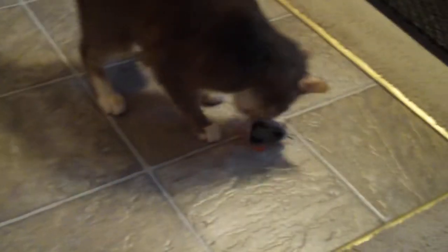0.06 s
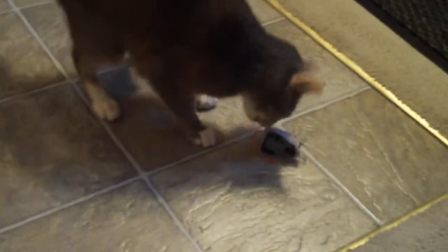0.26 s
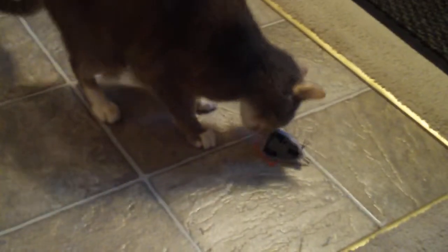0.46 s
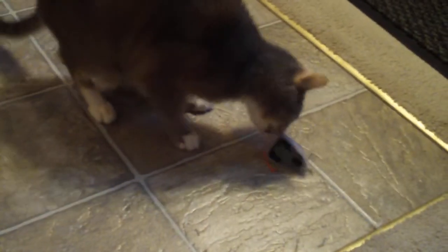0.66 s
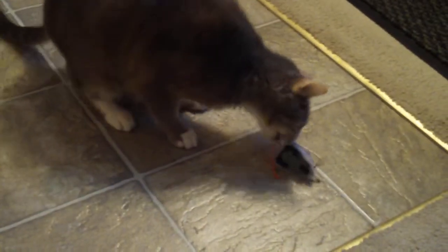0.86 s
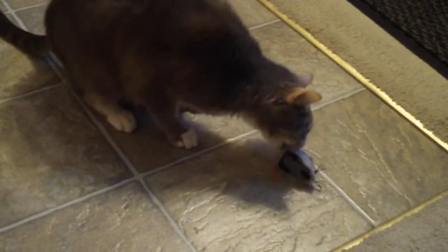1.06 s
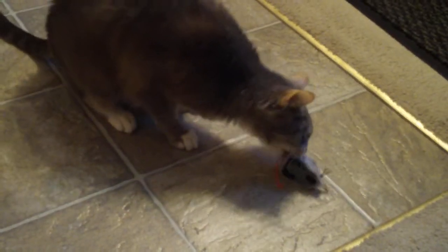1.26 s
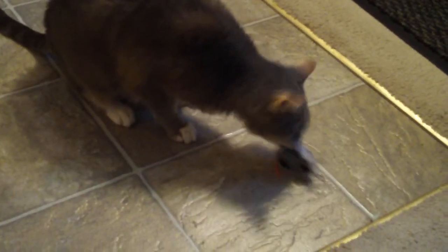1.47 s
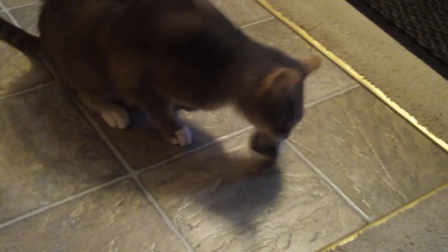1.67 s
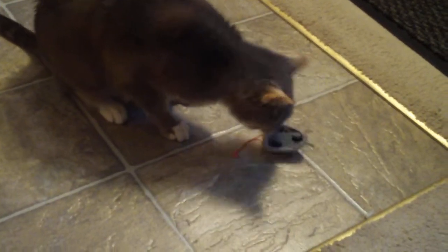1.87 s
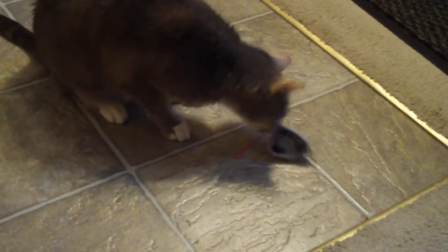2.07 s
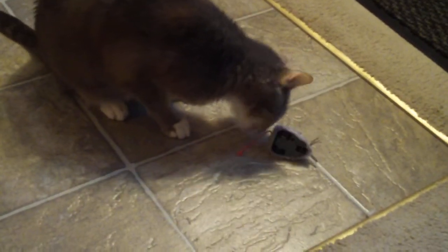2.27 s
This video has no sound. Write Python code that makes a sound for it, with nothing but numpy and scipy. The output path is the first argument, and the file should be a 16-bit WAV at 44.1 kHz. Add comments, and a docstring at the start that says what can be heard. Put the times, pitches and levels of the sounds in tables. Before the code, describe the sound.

In a small room, a battery-powered toy mouse whirs three times, gears ticking and plastic rattling against tile. It clacks as a cat tips it over, then runs a fourth time, over a faint deep rumble and steady hiss.

```python
"""Deep rumble and steady, thin-edged hiss throughout; a small room answers the toy faintly.
From 0.2 s a motorised toy mouse whirs in three short runs on a tiled floor: gears tick and catch,
loose works rattle in the hollow plastic shell, the shell knocks on the tile.
At 1.5-1.7 s a cat nudges the toy and knocks it over; the body clacks.
At 1.8 s a fourth run follows, tipped over and so in another colour."""
import sys
import numpy as np
from scipy import signal
from scipy.fft import rfft, irfft, next_fast_len
from scipy.io import wavfile
from scipy.ndimage import uniform_filter1d, map_coordinates

SR = 44100
rng = np.random.default_rng(int(sys.argv[2]) if len(sys.argv) > 2 else 0)


def wav_out(sig):
    """Save sig, one row per channel (or a flat mono array), as 16-bit PCM at SR to the path in sys.argv[1]."""
    wavfile.write(sys.argv[1], SR, np.round(np.clip(np.atleast_2d(sig).T, -1, 1) * 32767).astype(np.int16))


N = 105840

# motor runs: (start [s], driven for [s], level [dB], swell [dB/s], run-down [dB/s], tipped [0/1])
MOTOR_RUNS = [(.204, 0.18, -32, 14, 125, 0), (0.614, 0.17, -32, 8.5, 110.5, 0),
              (.966, .255, -32, -4.5, 160.5, 0), (1.789, .25, -33.5, 5, 144.5, 1)]
# works grind harder or ease off: (time [s], half length [s], change [dB])
GRIND_SURGES = [(0.338, 0.011, -9), (0.357, 0.0099, 2), (0.66, 0.011, 5.5), (0.684, 0.021, -4.5),
                (0.747, 0.034, 3), (0.772, 0.024, -7.5), (0.798, 0.0046, 7.5), (1.119, 0.006, 4.5),
                (1.148, 0.016, -4.5), (1.176, 0.0095, 4), (1.281, 0.014, 8), (1.99, 0.02, 3),
                (2.056, 0.011, -6.5)]
# works, toy upright: (frequency [Hz], level [dB])
UPRIGHT_SPECTRUM = [(300, -22), (1100, -22.5), (1700, -13.5), (2600, 3.5), (3600, -13), (4350, -6.5),
                    (4900, -0.5), (6100, -0.5), (7900, -8.5), (8600, -4), (9500, 4), (10500, 4), (11600, 0),
                    (12400, 2), (14600, -6.5), (15400, -10)]
# works, toy tipped over: (frequency [Hz], level [dB])
TIPPED_SPECTRUM = [(300, -24), (1100, -24.5), (2600, -4), (3600, -11.5), (4800, -2.5), (6100, -1.5),
                   (7500, -6), (8800, -4), (10300, 3), (11100, 4.5), (12300, -1.5), (13300, -6.5),
                   (15400, -20.5)]
# gear catches: (time [s], level [dB])
GEAR_CATCHES = [(.2455, -16), (.3015, -33), (.361, -29), (.381, -21), (.7915, -16), (.848, -20.5),
                (.8985, -22), (1.0392, -24), (1.2158, -16), (1.796, -18), (2.079, -33), (2.111, -22)]
# shell resonances: (frequency [Hz], width [Hz], level [dB])
SHELL_MODES = [(1680, 142, -16), (2510, 204, -9), (2590, 124, 2), (2997, 93, -12), (4950, 100, -17.5)]
# shell knocks on the tile: (time [s], level [dB])
TILE_KNOCKS = [(.247, -29), (.348, -23.5), (.361, -46), (.378, -29), (.397, -31), (.414, -31), (.448, -25),
               (.520, -30.5), (.618, -31), (.707, -25.5), (.7915, -19.5), (.801, -24), (.825, -25),
               (.9686, -25), (1.003, -22), (1.176, -23), (1.187, -28), (1.248, -23.5), (1.256, -28),
               (1.275, -27), (1.296, -23), (1.526, -43), (1.586, -40), (1.6025, -23), (1.609, -24.5),
               (1.622, -31), (1.644, -26.5), (1.692, -27.5), (1.719, -31), (1.783, -36), (1.792, -22.5),
               (1.879, -28), (1.983, -21), (1.988, -27.5), (2.018, -25), (2.154, -43)]
# body clacks as the cat tips it: (time [s], level [dB])
TIP_CLACKS = [(1.513, -39), (1.529, -39), (1.602, -30), (1.6203, -18.5), (1.6238, -26), (1.631, -26),
              (1.6425, -23.5), (1.655, -27), (1.6838, -19.5), (1.6932, -29), (1.699, -27.5), (1.715, -35)]
# clack colour: (frequency [Hz], level [dB])
CLACK_SPECTRUM = [(400, -26.5), (1800, -8.5), (3700, -11), (4800, 4), (6500, -13), (9000, -9), (11400, 2),
                  (12600, -5), (13500, -12), (15400, -20)]
# dull bumps: (time [s], level [dB])
DULL_BUMPS = [(.068, -47), (1.216, -39), (1.230, -39.5), (2.066, -44)]
# bump colour: (frequency [Hz], level [dB])
BUMP_SPECTRUM = [(300, -16.5), (700, -7.5), (1100, 0.5), (1550, -8.5), (2200, -5), (6000, -56)]
# sagging hum: (time [s], frequency [Hz], level [dB])
HUM_GLIDE = [(0.679, 304.2, -58), (0.841, 281.6, -57)]
# room rumble: (frequency [Hz], level [dB])
RUMBLE_SPECTRUM = [(12, -11), (27, 5.5), (35, -14), (45, -4.5), (60, -8), (100, -17.5), (130, -16.5),
                   (180, -19.5), (280, -18.5), (450, -30), (600, -45.5), (2000, -48), (8000, -50)]
# rumble swells: (time [s], change [dB])
RUMBLE_SWELLS = [(.12, 2.5), (.3, -4), (.6, 2.5), (.85, -1.5), (1.42, 4.5), (1.57, -4), (1.7, 1), (2.05, 0),
                 (2.299, 5.5)]
# steady hiss with a thin, high edge near 15 kHz: (frequency [Hz], level [dB])
HISS_SPECTRUM = [(100, 10), (900, 10), (1600, 6), (3200, 1.5), (4200, 5.5), (5100, 2), (6500, -6.5),
                 (7500, -1), (7900, 10), (8600, 1), (9800, 2.5), (11300, -14), (12200, -4.5), (13700, -7),
                 (14600, -26), (15000, -7), (15400, 7)]
# DC per channel, left then right: (offset [full scale])
CHANNEL_OFFSETS = [
    [.1303],
    [-.1253],
]

START_DIP_DB, SPIN_UP_S = 5, .022
COAST_S, STOP_DB_PER_S = .18, 230  # friction stops the works after coasting
TICKS_PER_S, TICK_SPREAD_DB, TICK_RISE_S, TICK_DECAY_S = 300, 7, .0014, .00073
TAPS_PER_S, TAP_SPREAD_DB, TAP_RISE_S, TAP_DB = 200, 6, .0006, -5.5
SPEED_EXPONENT, TAP_EXPONENT = .3, .75
SCATTER_GAPS, RUBBING_DB = .3, -14.5
MODE_DETUNE, MODE_SPREAD_DB = .018, 2
SNAP_RISE_S, CATCH_DECAY_S, CLACK_DECAY_S = .0011, .00042, .00017
CHATTER_DB, CHATTER_DECAY_S = -20.5, .006
BUMP_RISE_S, BUMP_DECAY_S = .0026, .0047
HUM_WAVER_HZ, HUM_FADE_DB_PER_S = 18, 90
ROOM_T60_S, ROOM_DB = .14, -10
RUMBLE_DB, THROB_DB, THROBS_PER_S = -51, 1.5, 14
DRONE_HZ, DRONE_DB, HISS_DB = 34.7, -50.5, -56.5
BAND_LIMIT_HZ = 15400


def motor_run(start_s, driven_s, level_db, swell_db_per_s, run_down_db_per_s, tipped):
    """Works spin up, rattle and coast, ticks slowing as they fade. Returns rasp and shell taps."""
    now = np.arange(N) / SR
    t = now - start_s
    coast_s = np.maximum(t - driven_s, 0)
    dip_db = START_DIP_DB * np.exp(-np.maximum(t, 0) / SPIN_UP_S)
    drive_db = swell_db_per_s * np.clip(t, 0, driven_s) - dip_db
    strength = amp(drive_db - run_down_db_per_s * coast_s) * (t > 0)
    surge_db = sum(db * np.exp(-((now - s) / half_s) ** 2) for s, half_s, db in GRIND_SURGES)
    level = amp(level_db + surge_db - STOP_DB_PER_S * np.maximum(coast_s - COAST_S, 0))
    speed = strength ** SPEED_EXPONENT
    driven = (t > 0) & (t < driven_s)
    ticks = bursts(contacts(TICKS_PER_S * speed, TICK_SPREAD_DB), TICK_RISE_S, TICK_DECAY_S)
    grain = np.sqrt(ticks ** 2 / np.mean(ticks[driven] ** 2) + amp(RUBBING_DB) ** 2)
    spectrum = TIPPED_SPECTRUM if tipped else UPRIGHT_SPECTRUM
    rasp = coloured(level * strength * grain * rng.standard_normal(N), spectrum)
    taps = amp(TAP_DB) * level * strength ** TAP_EXPONENT * contacts(TAPS_PER_S * speed, TAP_SPREAD_DB)
    return np.array([rasp, taps])


def shell(spikes):
    """Each spike rings the hollow shell's modes, slightly retuned and rebalanced per hit."""
    at = np.flatnonzero(spikes)
    t = np.arange(SR // 50) / SR
    draw = rng.standard_normal((len(at), len(SHELL_MODES), 2, 1))
    ring = 0
    for k, (hz, width_hz, db) in enumerate(SHELL_MODES):
        gain = amp(db + MODE_SPREAD_DB * draw[:, k, 0])
        tuned_hz = hz * (1 + MODE_DETUNE * draw[:, k, 1])
        ring += gain * np.exp(-np.pi * width_hz * t) * np.sin(2 * np.pi * tuned_hz * t)
    ring = spikes[at, None] * ring * (1 - np.exp(-t / TAP_RISE_S))
    samples = at[:, None] + np.arange(len(t))
    return np.bincount(samples.ravel(), ring.ravel(), N)[:N]


def gear_catches():
    """A gear catches and snaps free: short bursts in the upright works' colour."""
    snap = bursts(impulses(GEAR_CATCHES), SNAP_RISE_S, CATCH_DECAY_S)
    return coloured(snap * rng.standard_normal(N), UPRIGHT_SPECTRUM)


def clacks():
    """Plastic body hits the tile: sharp snap, then brief chatter."""
    spikes = impulses(TIP_CLACKS)
    snap = bursts(spikes, SNAP_RISE_S, CLACK_DECAY_S)
    chatter = amp(CHATTER_DB) * bursts(spikes, SNAP_RISE_S, CHATTER_DECAY_S)
    return coloured((snap + chatter) * rng.standard_normal(N), CLACK_SPECTRUM)


def bumps():
    """Dull noise bursts with a softer onset."""
    envelope = bursts(impulses(DULL_BUMPS), BUMP_RISE_S, BUMP_DECAY_S)
    return coloured(envelope * rng.standard_normal(N), BUMP_SPECTRUM)


def hum():
    """Faint wavering tone swells, sags and fades around the second run."""
    t = np.arange(N) / SR
    s, hz, db = np.transpose(HUM_GLIDE)
    waver = unit(uniform_filter1d(rng.standard_normal(N), size=700))
    phase = 2 * np.pi * np.cumsum(np.interp(t, s, hz) + HUM_WAVER_HZ * waver) / SR
    fade_db = HUM_FADE_DB_PER_S * abs(t - np.clip(t, s[0], s[-1]))
    return np.sqrt(2) * np.sin(phase) * amp(np.interp(t, s, db) - fade_db)


def room(x):
    """Direct sound plus a short diffuse tail from floor and walls."""
    t = np.arange(SR // 2) / SR
    tail = rng.standard_normal(len(t)) * amp(-60 * t / ROOM_T60_S) * (t > .003)
    return x + amp(ROOM_DB) * signal.fftconvolve(x, tail / np.linalg.norm(tail))[:N]


def background(rumble_side_db=-12, hiss_side_db=-17):
    """Throbbing rumble, deep drone and steady hiss, all near centre."""
    t = np.arange(N) / SR
    noise = rng.standard_normal((4, N))
    rumble_mid, rumble_side = (unit(coloured(x, RUMBLE_SPECTRUM)) for x in noise[:2])
    hiss_mid, hiss_side = amp(HISS_DB) * coloured(noise[2:], HISS_SPECTRUM)
    drone = amp(DRONE_DB) * np.sqrt(2) * np.sin(2 * np.pi * (DRONE_HZ * t + rng.random()))
    throb_db = THROB_DB * map_coordinates(rng.standard_normal(200), [t * THROBS_PER_S])
    swell_db = np.interp(t, *np.transpose(RUMBLE_SWELLS))
    mid = amp(RUMBLE_DB + swell_db + throb_db) * rumble_mid + drone + hiss_mid
    side = amp(RUMBLE_DB + rumble_side_db) * rumble_side + amp(hiss_side_db) * hiss_side
    return np.array([mid + side, mid - side])


def contacts(rate_per_s, spread_db, count=200):
    """Spikes of uneven gap and size at a varying rate."""
    slip = SCATTER_GAPS * rng.standard_normal(count)
    size_db = spread_db * rng.uniform(-1, 1, count)
    at = np.searchsorted(np.cumsum(rate_per_s) / SR, np.abs(np.arange(count) + slip))
    return np.bincount(at, amp(size_db), N + 1)[:N]


def impulses(rows):
    """One spike per (time [s], level [dB]) row."""
    s, db = np.transpose(rows)
    return np.bincount(np.round(s * SR).astype(int), amp(db), N)[:N]


def bursts(spikes, rise_s, decay_s):
    """Envelope rising and decaying at each spike; overlaps add in power."""
    power = signal.lfilter([1], [1, -np.exp(-2 / (decay_s * SR))], spikes ** 2)
    pole = np.exp(-2 / (rise_s * SR))
    return np.sqrt(np.abs(signal.lfilter([(1 - pole) ** 2], np.poly([pole, pole]), power)))


def coloured(x, points):
    """Minimum-phase filter through (frequency [Hz], level [dB]) points; keeps white-noise power."""
    def response(hz):
        point_hz, db = np.transpose(points)
        gain = unit(amp(np.interp(np.log(hz + 1), np.log(point_hz), db)))
        cepstrum = irfft(np.log(gain))
        half = len(cepstrum) // 2
        cepstrum[1:half] *= 2
        cepstrum[half + 1:] = 0
        return np.exp(rfft(cepstrum))
    return filtered(x, response)


def filtered(x, response):
    """Apply a complex frequency response."""
    size = 2 * next_fast_len(N)
    return irfft(rfft(x, size) * response(np.fft.rfftfreq(size, 1 / SR)), size)[..., :x.shape[-1]]


def amp(db):
    """dB to gain."""
    return 10 ** (np.asarray(db) / 20)


def unit(x):
    """Scale to rms 1."""
    return x / np.sqrt(np.mean(x ** 2) + 1e-20)


def scene():
    """Toy centred in the room, over the stereo background."""
    ambience = background()
    accents = clacks() + bumps() + gear_catches() + hum() + shell(impulses(TILE_KNOCKS))
    rasp, taps = sum(motor_run(*run) for run in MOTOR_RUNS)
    return room(rasp + shell(taps) + accents) + ambience


def record(dry):
    """Steep low-pass; opposite DC offsets on the two channels."""
    return filtered(dry, lambda hz: 1 / np.sqrt(1 + (hz / BAND_LIMIT_HZ) ** 120)) + CHANNEL_OFFSETS


dry = scene()
out = record(dry)
wav_out(out)
```